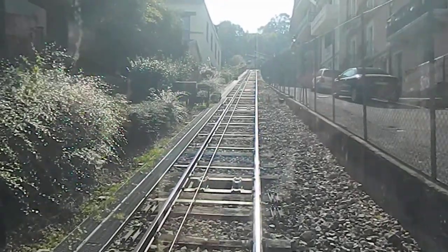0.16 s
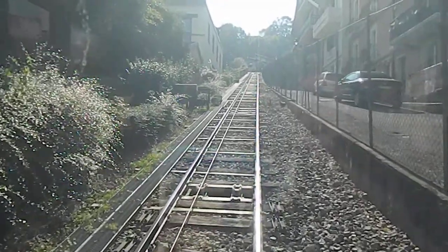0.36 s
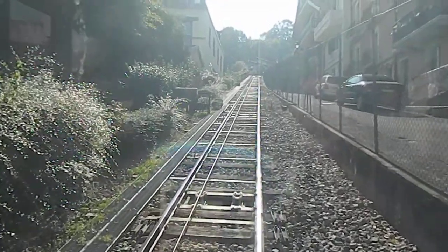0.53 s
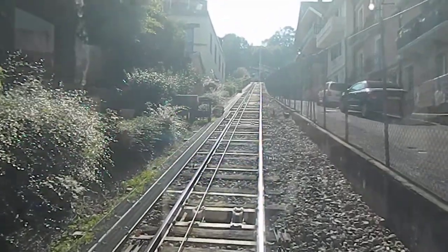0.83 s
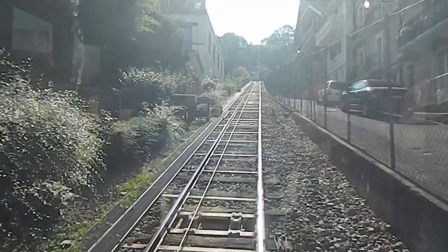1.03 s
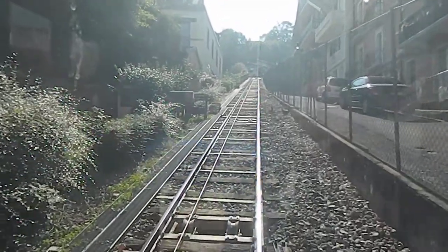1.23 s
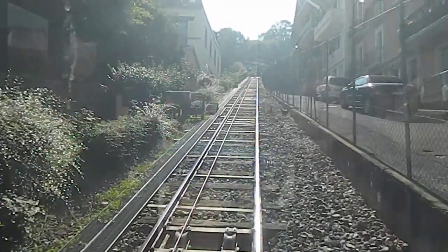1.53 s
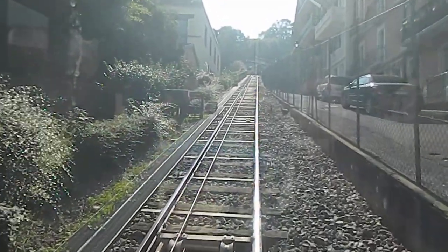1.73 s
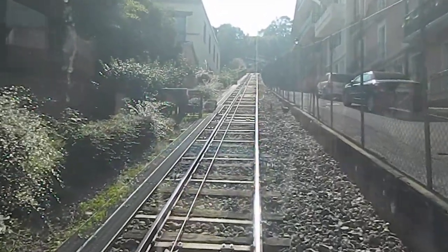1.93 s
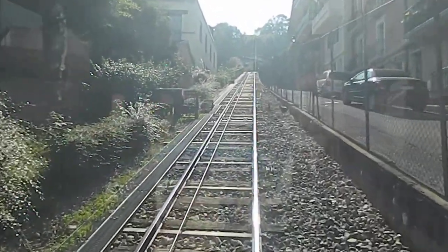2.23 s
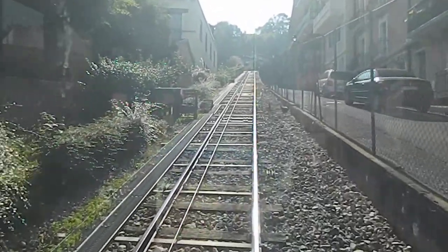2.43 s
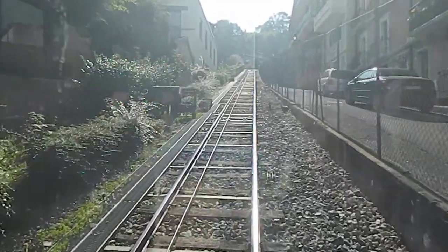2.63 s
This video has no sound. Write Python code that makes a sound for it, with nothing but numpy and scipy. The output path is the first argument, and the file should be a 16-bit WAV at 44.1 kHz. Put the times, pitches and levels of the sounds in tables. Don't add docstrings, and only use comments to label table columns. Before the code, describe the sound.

Low rumble inside a cable railway car creeping uphill, with a humming floor, irregular soft wheel thuds and small metallic ticks; cable scraping grows busier near two seconds, over a thin air hiss, in close stereo.

```python
import sys
import numpy as np
from scipy import signal
from scipy.fft import rfft, irfft
from scipy.io import wavfile
from scipy.ndimage import uniform_filter1d

SR = 44100
rng = np.random.default_rng(int(sys.argv[2]) if len(sys.argv) > 2 else 0)


def ratio(d):
    e = np.asarray(d, float) / 20
    return 10 ** e


def transcribe(u):
    v = np.clip(np.atleast_2d(u).T, -1, 1)
    q = np.round(v * 32767).astype(np.int16)
    wavfile.write(sys.argv[1], SR, q)


N = 122157
T = np.arange(N) / SR
F = np.maximum(np.fft.rfftfreq(N, 1 / SR), 1)


def along(table, col):
    hz = [row[0] for row in table]
    return np.interp(np.log(F), np.log(hz), [row[col] for row in table])


def unit(x):
    return x / np.sqrt(np.mean(x ** 2))


def walk(rate_hz):
    k = int(SR / rate_hz)
    steps = np.repeat(rng.standard_normal(N // k + 1), k)
    smooth = uniform_filter1d(uniform_filter1d(steps, k), k)
    return unit(smooth[:N])


def swell(middle_s, length_s):
    return np.exp(-(2 * (T - middle_s) / length_s) ** 2)


def bell(hz, width_hz):
    return 1 / (1 + ((F - hz ** 2 / F) / width_hz) ** 2)


def pair(gain):
    # f/Hz, likeness (0-1), left minus right/dB
    microphones = [(30, .97, -5.5), (80, .96, -3.9), (250, .97, -2.3), (600, .95, -2.1), (1400, .82, -1.3),
                   (2800, .57, .1), (5600, .36, 0), (10000, .03, 0)]
    like = np.clip(along(microphones, 1), 0, 1)
    mid, side = rfft(rng.standard_normal((2, N)))
    sign = np.array([[1], [-1]])
    both = np.sqrt(1 + like) * mid + sign * np.sqrt(1 - like) * side
    both = both * ratio(sign * along(microphones, 2) / 2)
    top_hz = 15700
    return unit(irfft(both * gain * (F < top_hz), N))


def bass_pan():
    return ratio(np.array([[-1.9], [1.9]]))


def banded(table, shared_db, own_db):
    out = 0
    shared = walk(11.96)
    for octave in range(6, 15):
        overlap = np.clip(1 - np.abs(np.log2(F) - octave), 0, 1) ** .5
        band = overlap * ratio(along(table, 1))
        strength = np.sqrt(np.mean(band ** 2))
        out = out + pair(band) * strength * ratio(shared_db * shared + own_db * walk(12.47))
    return unit(out)


def rings(table, length_s):
    out = np.zeros(N)
    for (s, db, hz), turn in zip(table, rng.random(len(table))):
        out += ratio(db) * swell(s, length_s) * np.sin(2 * np.pi * (hz * (T - s) + turn))
    return out


def air_hiss():
    # f/Hz, level per Hz/dB
    colour = [(600, -29), (1500, -1), (3200, -3.5), (4000, -7.5), (6600, -10.5), (7600, -14.5),
              (11500, -18), (15600, -26)]
    return ratio(-51) * banded(colour, shared_db=.25, own_db=.35)


def wheel_load_db():
    # t/s, level/dB
    load = [(0, -36.5), (.3, -38), (.45, -39), (.55, -38), (.9, -39.5), (.98, -37), (1.1, -39.5),
            (1.3, -43), (1.65, -41), (1.76, -36), (1.83, -37), (1.95, -36.5), (2.08, -36), (2.14, -41),
            (2.45, -42.5), (2.63, -40.5), (2.77, -42)]
    db = np.interp(T, [row[0] for row in load], [row[1] for row in load])
    return db - db.mean()


def rolling_roar(load_db):
    # f/Hz, level per Hz/dB
    colour = [(120, -19), (200, -3.5), (400, -0.5), (800, -3.5), (1500, -12), (3000, -23), (4000, -40),
              (8000, -57)]
    return ratio(-38.5 + load_db) * banded(colour, shared_db=.5, own_db=.6)


def car_body(load_db):
    # f/Hz, width/Hz, level/dB
    modes = [(34.4, 9.1, -33), (48, 15, -40), (62.2, 19.4, -34), (80, 26, -30), (118, 19.3, -33),
             (149.3, 19, -39), (169.5, 12.4, -43), (193.3, 24, -42.5), (255, 18, -45), (289, 38, -45),
             (364, 36, -48.5), (433.4, 14, -55)]
    follows_load, skirt = 0.4, 0.79
    low_cut = np.clip(F / 31, 0, 1) ** 4
    out = 0
    for hz, width_hz, db in modes:
        level_db = db + follows_load * load_db + 1.35 * walk(14)
        out = out + ratio(level_db) * pair(bell(hz, width_hz) ** skirt * low_cut)
    return out


def squeaks():
    # t/s, level/dB, f/Hz, length/s, width/Hz
    rubs = [
        (1.02, -56, 5000, .008, 3000),
        (2.642, -53, 3350, .024, 250),
        (2.675, -48.5, 1950, .03, 300),
        (2.715, -54, 3800, .05, 800),
        (1.77, -39, 800, .05, 500),
        (1.92, -42, 1300, .03, 900),
        (1.875, -39, 750, .04, 450),
        (2.71, -55, 3350, .06, 200),
        (2.55, -51, 1450, .05, 100),
    ]
    out = 0
    for s, db, hz, length_s, width_hz in rubs:
        out = out + ratio(db) * swell(s, length_s) * pair(bell(hz, width_hz))
    return out


def fitting_taps():
    # t/s, peak level/dB, f/Hz
    taps = [(.015, -33, 386), (.042, -37, 530), (.063, -33, 332), (.102, -36, 444), (.141, -37, 594),
            (.263, -32.5, 420), (.332, -34, 390), (.518, -38, 640), (.979, -36, 540), (1.02, -59, 6150),
            (1.76, -32.5, 733), (1.769, -37, 361), (1.79, -34, 396), (1.787, -39, 700), (1.865, -40, 940),
            (1.868, -36, 546), (1.88, -35, 645), (1.886, -42, 950), (1.94, -36, 430), (1.943, -33.5, 674),
            (1.955, -37, 850), (2.02, -33.5, 427), (2.044, -36, 645), (2.098, -31, 343), (2.268, -49, 2930),
            (2.268, -57, 3710), (2.636, -49, 3384), (2.65, -50, 3240), (2.667, -56, 3280),
            (2.72, -55, 3250), (2.73, -38, 316)]
    return rings(taps, length_s=.02)


def scrape_burst(start_s, length_s):
    rise = np.clip((T - start_s) / .01, 0, 1)
    tail = np.exp(-np.maximum(T - start_s - length_s, 0) / .014)
    return rise * tail


def cable_scrapes():
    # f/Hz, level per Hz/dB
    colour = [(350, -24), (800, -4.5), (1600, -2), (3200, -7), (5000, -12.5), (8700, -18.5), (12000, -25),
              (15600, -36)]
    # start t/s, length/s, level/dB, top f/Hz
    dull = [(0.388, .04, -46.5, 2500), (0.517, 0.12, -50.5, 2490), (0.94, 0.057, -43.5, 4500),
            (0.946, 0.1, -49.5, 1500), (1.013, 0.053, -49.5, 7500), (1.671, .045, -43, 6000),
            (1.731, 0.33, -49.5, 6000), (1.756, 0.04, -50, 1200), (1.823, 0.043, -43, 4000),
            (1.9, 0.059, -43.5, 3500), (2.253, 0.012, -48, 8000), (2.288, .015, -48, 5000),
            (2.602, 0.17, -56, 5000)]
    # start t/s, length/s, level/dB, brightness/dB per octave
    bright = [
        (.94, 0.12, -56, 2.5),
        (1.664, .04, -51, 4),
        (1.709, 0.03, -49.5, 1),
        (1.726, 0.34, -54, 4),
        (1.993, 0.021, -46, 4.5),
        (2.031, 0.031, -45, 3.5),
        (2.074, 0.029, -47, 4),
        (2.525, .035, -55, 4),
        (2.57, 0.11, -54.5, 1.5),
    ]
    out = 0
    for s, length_s, db, top_hz in dull:
        gain = ratio(along(colour, 1)) / (1 + (F / top_hz) ** 4)
        out = out + scrape_burst(s, length_s) * ratio(db) * pair(gain)
    for s, length_s, db, tilt_db in bright:
        gain = ratio(along(colour, 1) + tilt_db * np.log2(F / 3000))
        out = out + scrape_burst(s, length_s) * ratio(db) * pair(gain)
    grit_db = 1.3 * walk(70)
    return out * ratio(grit_db)


def floor_panel():
    # t/s, peak level/dB, length/s
    hum_swells = [(0.02, -15.5, 0.083), (0.082, -20.5, 0.066), (0.161, -15, 0.08), (0.245, -22, 0.054),
                  (0.313, -19, 0.077), (0.381, -17.5, 0.056), (0.452, -18, 0.071), (0.56, -13, 0.061),
                  (.657, -15, 0.095), (0.782, -20, 0.088), (0.98, -18.5, 0.072), (1.056, -17.5, 0.077),
                  (2.39, -16, 0.045), (2.589, -10.5, 0.034), (2.672, -19.5, 0.047)]
    # t/s, peak level/dB, f/Hz
    high_rings = [(.049, -26.5, 172), (.12, -32, 172.4), (.203, -24.5, 155), (.307, -26, 158),
                  (.363, -29.5, 166), (.545, -22.5, 167.5), (0.804, -34, 148), (1.369, -25.5, 139.3),
                  (1.676, -29, 173.5), (1.774, -25.5, 161), (1.816, -25, 174), (1.9, -24.5, 146),
                  (1.97, -26.5, 179), (2.067, -30, 186), (2.144, -26, 171), (2.2, -27, 158),
                  (2.27, -26, 154), (2.437, -21.5, 144), (2.745, -22, 150)]
    hz = 107.8 * (1 + .006 * walk(9.5))
    roughness = ratio(.5 * walk(23))
    loudness = sum(ratio(db) * swell(s, length_s) for s, db, length_s in hum_swells)
    hum = roughness * loudness * np.cos(2 * np.pi * np.cumsum(hz) / SR)
    murmur = ratio(-38) * pair(bell(168.3, width_hz=8.4))
    return (hum + rings(high_rings, length_s=0.05)) * bass_pan() + murmur


def wheel_jolts():
    # t/s, level/dB, f/Hz, length/s
    blows = [(0.016, -21, 38, .07), (0.131, -18, 71, 0.031), (0.222, -24, 83, 0.062),
             (0.517, -11.5, 80, 0.014), (0.599, -22, 43, .07), (0.708, -19.5, 46, .07),
             (0.849, -29, 115, 0.085), (.86, -23, 78, .05), (0.928, -23, 83, 0.038),
             (1.022, -19, 48, 0.056), (1.03, -20.5, 155, 0.021), (1.121, -15.5, 77, 0.019),
             (1.23, -17.5, 75.4, 0.037), (1.43, -19, 98, 0.06), (1.55, -22, 115, 0.056),
             (1.648, -25, 116, .05), (1.752, -18, 46, 0.038), (1.989, -19, 126, 0.044),
             (1.724, -14, 92, 0.03), (1.84, -18, 95, 0.057), (1.911, -10.5, 96, 0.022),
             (1.961, -14.5, 101, 0.03), (2.037, -10.5, 87, 0.028), (2.079, -11.5, 81, 0.027),
             (1.5, -24, 166, 0.044), (1.602, -35, 274, 0.057), (1.941, -31, 255, 0.07),
             (2.02, -30, 250, .05), (2.11, -28, 193.5, 0.049), (2.189, -15.5, 80, 0.022),
             (2.276, -18.5, 94, 0.062), (2.333, -21, 119.3, 0.051), (2.344, -17.5, 73, 0.041),
             (2.442, -22, 69, 0.04), (2.495, -13, 92, 0.044), (2.533, -18.5, 88, 0.036),
             (2.058, -19, 52, 0.12), (2.63, -15, 82, 0.03), (2.734, -13.5, 88, 0.037)]
    out = np.zeros(N)
    for (s, db, hz, length_s), turn in zip(blows, rng.random(len(blows))):
        out += ratio(db) * swell(s, length_s) * np.sin(2 * np.pi * (hz * (T - s) + turn))
    return out * bass_pan()


def scene():
    load_db = wheel_load_db()
    background = air_hiss() + rolling_roar(load_db) + car_body(load_db)
    details = squeaks() + fitting_taps() + cable_scrapes()
    return background + details + floor_panel() + wheel_jolts()


def top_cut(x):
    return signal.sosfilt(signal.butter(12, 15710, fs=SR, output="sos"), x)


def record(dry):
    return top_cut(dry)


dry = scene()
out = record(dry)
transcribe(out)
```